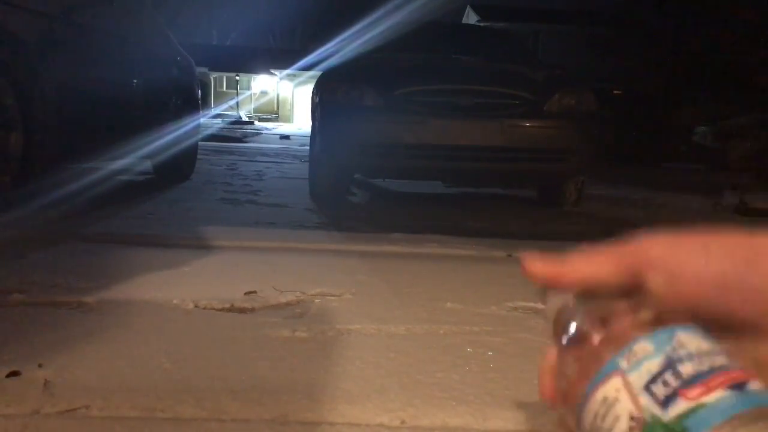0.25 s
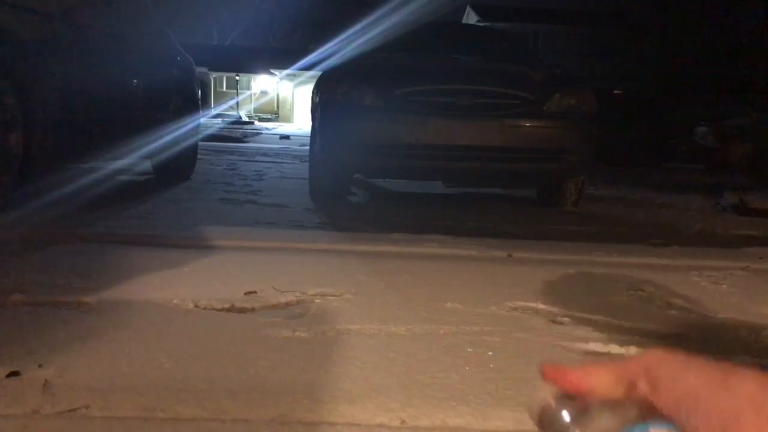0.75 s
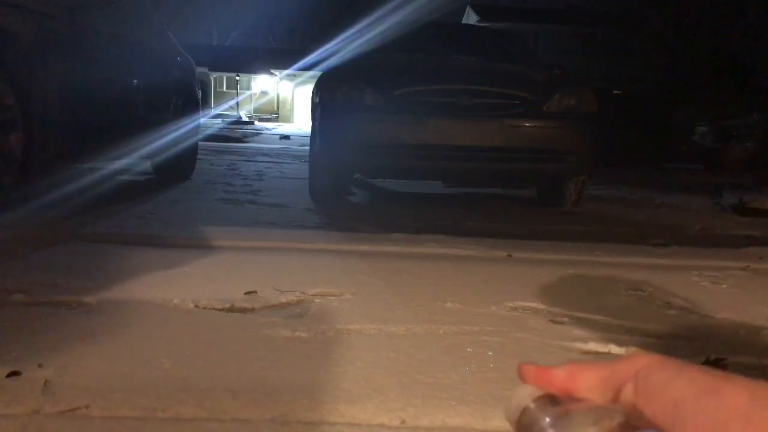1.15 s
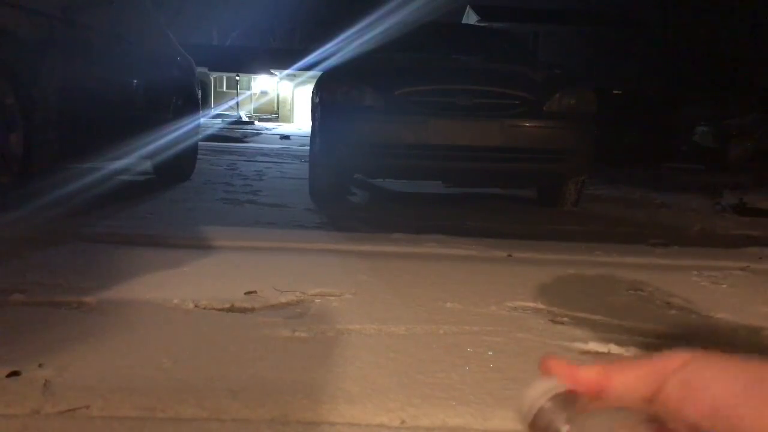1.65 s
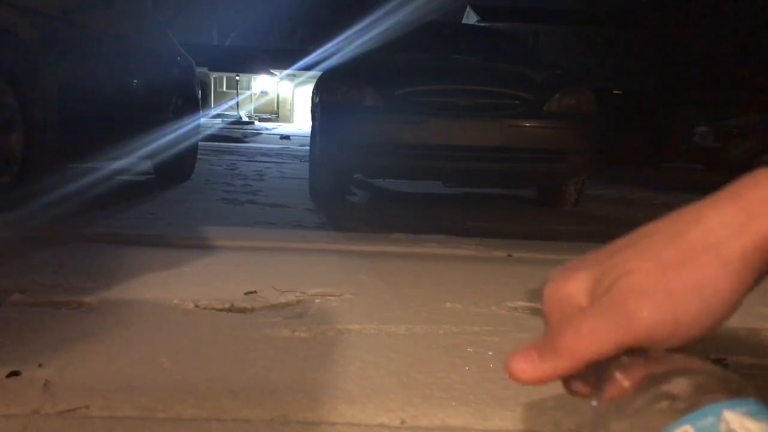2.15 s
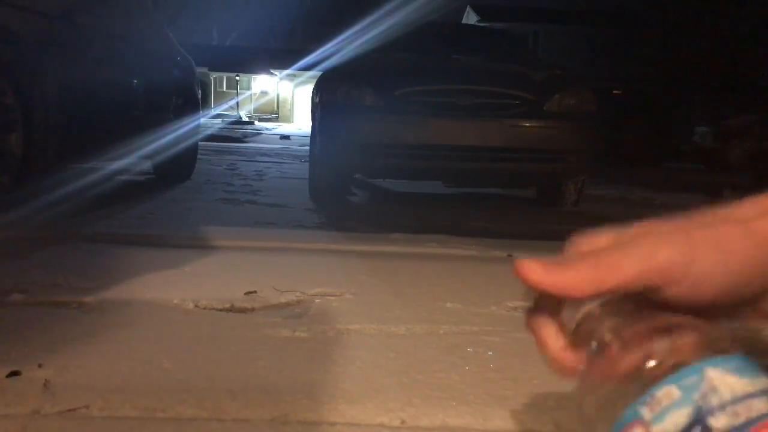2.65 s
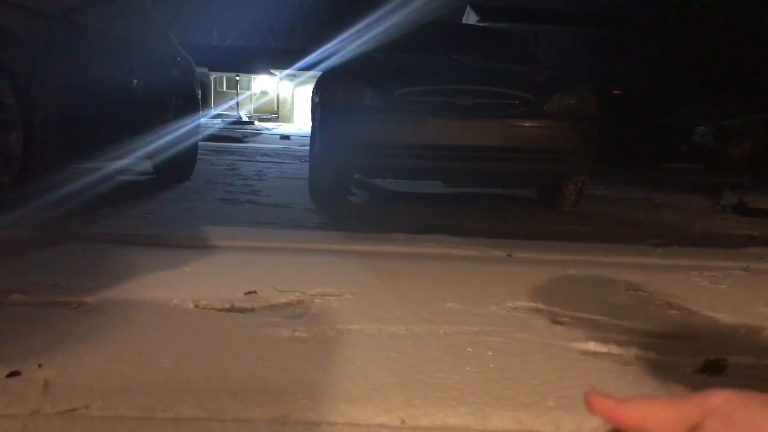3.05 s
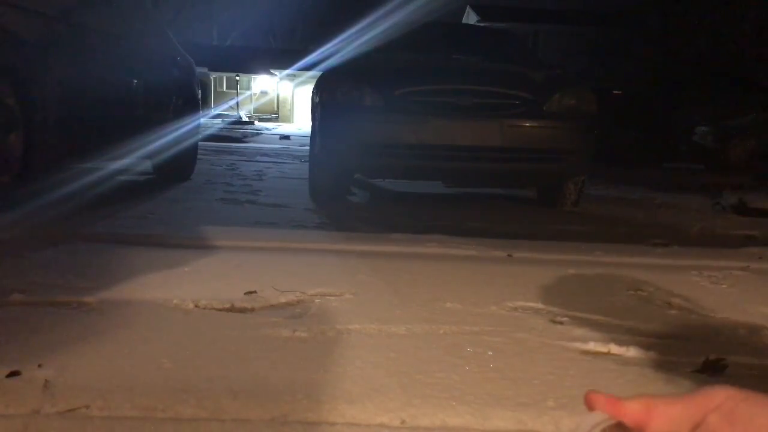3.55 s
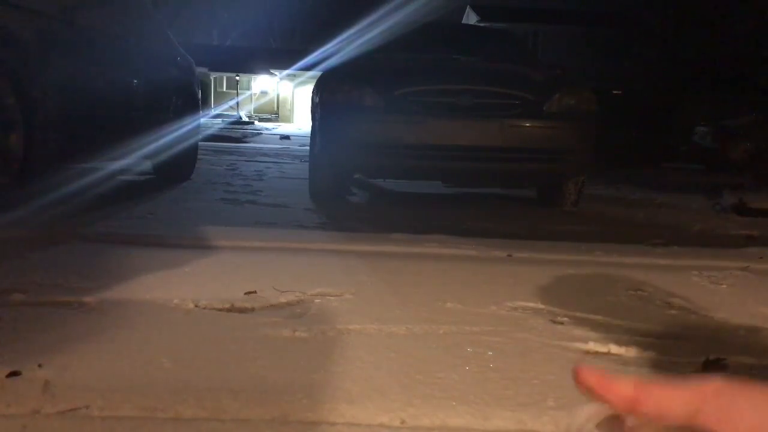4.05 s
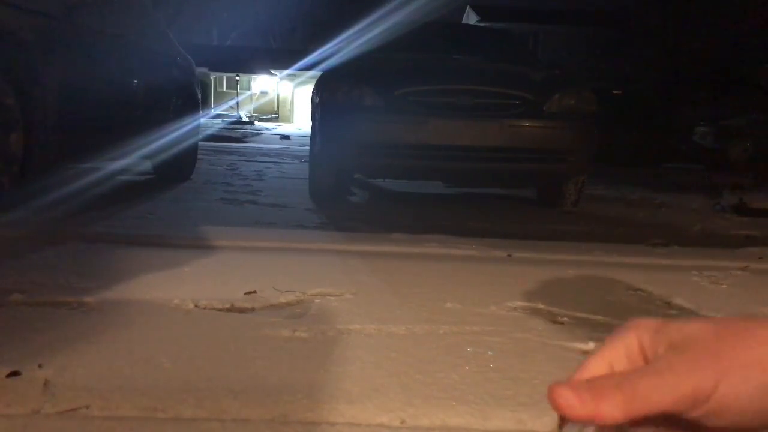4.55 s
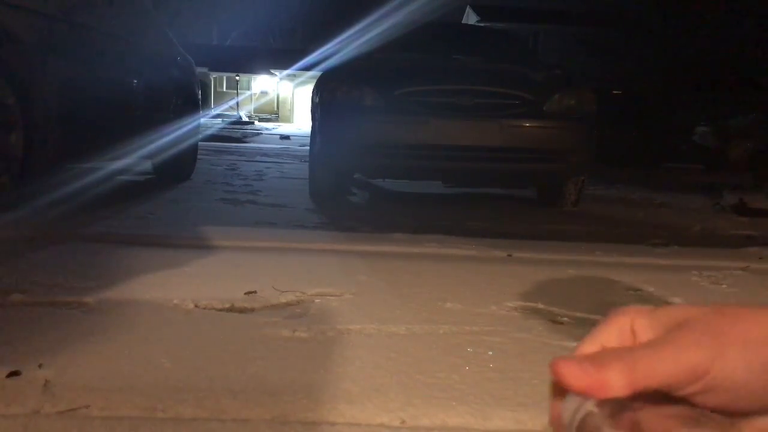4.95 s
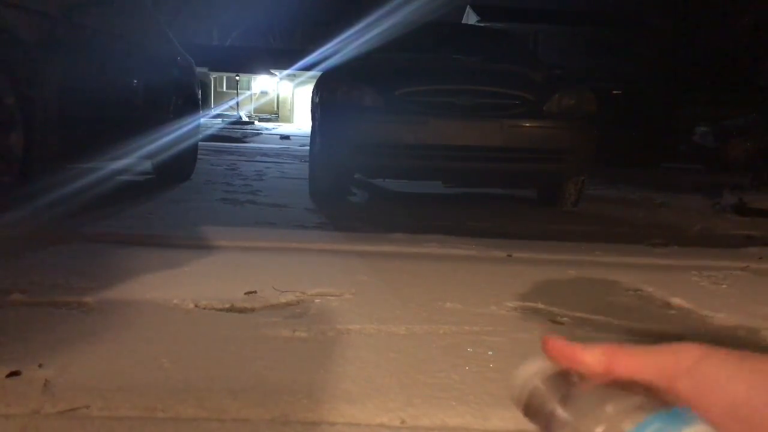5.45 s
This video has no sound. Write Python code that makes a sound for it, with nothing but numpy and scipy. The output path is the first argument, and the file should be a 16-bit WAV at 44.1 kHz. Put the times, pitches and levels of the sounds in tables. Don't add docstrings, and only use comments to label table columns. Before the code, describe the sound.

A plastic bottle is handled very close to a phone microphone outdoors at night. From 0 to 0.6 s, crisp cap snaps, grainy finger slips and a short hollow wall pop at 0.2 s sound over a faint leak of gas. At about 0.7 s the gas bursts out as a loud, bright, slightly fluttering hiss, holding steady until 1.6 s, then thinning with a plastic knock near 1.8 s and trailing away by 2.4 s. Quiet rubs, squeaks and dull knocks follow, with small snaps around 2.9 s. A second, softer hiss grows from 3.25 s, strongest at 3.65 to 3.9 s with a thin wavering whistle, and fades by 4.1 s. Hard plastic clicks cluster at 4.15 to 4.2 s with a soft low thump, then finger scrapes, creaks and tiny spits become sparse until 5.7 s. Distant traffic rumbles very faintly throughout under thin air noise.

```python
import sys
import numpy as np
from scipy import signal
from scipy.fft import rfft, irfft
from scipy.io import wavfile
from scipy.ndimage import uniform_filter1d, map_coordinates

SR = 44100
rng = np.random.default_rng(int(sys.argv[2]) if len(sys.argv) > 2 else 0)


def volts(x):
    e = np.asarray(x, float) / 20
    return 10 ** e


def unload_wav(signal):
    wavfile.write(
        sys.argv[1],
        SR,
        np.round(np.clip(np.atleast_2d(signal).T, -1, 1) * 32767).astype(np.int16),
    )


N = 252252
T = np.arange(N) / SR
F = np.arange(N // 2 + 1) * SR / N + 1e-3


def track(table):
    return np.interp(T, *np.transpose(table))


def shaped(x, colour, lo_hz=0., hi_hz=SR, db=0):
    hz, level_db = np.transpose(colour)
    skirts = 1 / np.sqrt((1 + (lo_hz / F) ** 12) * (1 + (F / hi_hz) ** 12))
    gain = volts(np.interp(np.log(F), np.log(hz), level_db))
    y = irfft(rfft(x) * gain * skirts, N)
    return y * volts(db) / np.std(y)


def walk(rate_hz):
    hold = max(int(SR / rate_hz), 1)
    steps = np.repeat(rng.standard_normal(N // hold + 1), hold)
    return 0.79 * uniform_filter1d(uniform_filter1d(steps, hold), hold)[:N]


def resonance(x, hz, width_hz, order=1):
    half = width_hz / 2
    centre = np.hypot(hz, half)
    band = [centre - half, min(centre + half, .48 * SR)]
    return signal.sosfilt(signal.butter(order, band, "band", fs=SR, output="sos"), x)


def ring(hz, t60_s):
    t = T[:int(t60_s * SR)]
    return np.sin(2 * np.pi * hz * t) * np.exp(-np.log(1000) * t / t60_s)


def add(out, s, x):
    i = int(s * SR)
    out[i:i + len(x)] += x[:N - i]


# (centre [Hz], width [Hz], gain [ratio])
RIDGES = [(3140, 920, 0.27), (4430, 126, 0.44)]


def ridged(x):
    return x + sum(gain * resonance(x, hz, width_hz) for hz, width_hz, gain in RIDGES)


# (time [s], extra path [ms], share [0-1])
GROUND = [(0, 1.2, 0.4), (.3, .83, 0.5), (.7, 0.98, 0.16), (1.45, 0.94, 0), (2.2, 1.6, 0), (2.42, 0.75, .6),
          (3.2, 0.954, .24), (4.5, 0.92, .1), (4.75, 0.82, .5), (5.4, 1.2, .05)]


def ground_echo(gas):
    s, path_ms, share = np.transpose(GROUND)
    share = np.clip(np.interp(T, s, share), 0, 1)
    delay = np.interp(T, s, path_ms) * SR / 1000
    late = map_coordinates(gas, [np.arange(N) - delay], order=3)
    return (gas + share * late) / np.sqrt(1 + share ** 2)


# (frequency [Hz], density [dB per Hz])
JET_COLOUR = [(240, -63), (400, -18), (491, -28), (672, -28), (1590, -23.5), (2120, -19.5), (2680, -19),
              (4360, -13.5), (4860, -16.5), (6060, -13.5), (8300, -6.5), (9560, -6.5), (10500, -9.5),
              (12900, -0.5), (17100, 1.5)]
# (time [s], flow [dB], gap opening [about -1..1])
LONG_HISS = [(.64, -80, 0.35), (.71, -50.5, 0.6), (.742, -35.5, 1), (.8, -23.5, 0.94), (.86, -24, 1),
             (1.15, -23, 0.99), (1.585, -23, 0.59), (1.63, -26, 0.44), (1.79, -33, 0)]
LAST_GAS = [(1.82, -32.5, -1.6), (1.952, -30, -1.34), (2.054, -34.5, -1.1), (2.142, -36, 0.57),
            (2.25, -38.5, -0.067), (2.344, -50.5, 0.62), (2.4, -50.5, -.5), (2.47, -81, 0)]
SHORT_HISS = [(3.19, -76, 0), (3.254, -44, 0), (3.306, -38, 0.17), (3.386, -36.5, -0.14),
              (3.58, -30.5, 0.24), (3.664, -27, -0.071), (3.884, -26.5, -0.36), (4.12, -52.5, 0.071),
              (4.3, -87, 0)]
# (time [s], flow [dB])
LEAK = [(0, -38.5), (.148, -51), (.25, -51), (.42, -52), (.53, -49), (.66, -53.5), (2.4, -54), (2.52, -64),
        (2.87, -65), (3.04, -68), (3.13, -61), (4.2, -60), (4.68, -61.5), (4.85, -56.5), (5.13, -68),
        (5.43, -65.5), (5.72, -68)]
LEAK_MIDDLE_DB = -3.5
FULL_FLOW_DB = -23
# (level at full flow [dB], growth [dB/dB], per unit opening [dB])
MIDDLE, NECK_AIR, LOW = (-35.5, 1.08, 3.4), (-41.5, 0.73, 4.1), (-52, 0.51, 2.8)
SHUT_DB, SHUT_SLOPE = -49.5, 2.4


def jet():
    eddies = ridged(rng.standard_normal(N) * volts(1.0 * walk(900) + .5 * walk(250)))
    s, db, gap = np.transpose(LONG_HISS + LAST_GAS + SHORT_HISS)
    flow_db, gap = np.interp(T, s, db), np.interp(T, s, gap)

    def eddy_gain(full_db, growth, gap_db):
        return volts(full_db + growth * (flow_db - FULL_FLOW_DB) + gap_db * gap)

    leak = hush() * volts(track(LEAK))
    shut = volts(SHUT_SLOPE * np.minimum(flow_db - SHUT_DB, 0))
    top = volts(flow_db) + leak
    middle = eddy_gain(*MIDDLE) + volts(LEAK_MIDDLE_DB) * leak
    neck, low = eddy_gain(*NECK_AIR) * shut, eddy_gain(*LOW) * shut
    top = top * volts(1.2 * walk(120))
    middle = middle * volts(1.0 * walk(90))
    gas = top * shaped(eddies, JET_COLOUR, 9980, db=2.5)
    gas = gas + middle * shaped(eddies, JET_COLOUR, 4900, 11900, db=-0.5)
    gas = gas + neck * shaped(eddies, JET_COLOUR, 2870, 5450, db=-2.5)
    gas = gas + low * shaped(eddies, JET_COLOUR, 540, 2264, db=-0.4)
    return ground_echo(gas)


# (time [s], pitch [Hz], level [dB])
WHISTLE = [(3.605, 1940, -57), (3.615, 1950, -52), (3.679, 2140, -51.5), (3.795, 1995, -52.5),
           (3.803, 2000, -55.5), (3.901, 1916, -54), (3.915, 1830, -66)]


def whistle():
    s, hz, db = np.transpose(WHISTLE)
    waver = 1 + .009 * walk(200)
    phase = 2 * np.pi * np.cumsum(np.interp(T, s, hz) * waver) / SR
    ragged_rad = .6 * walk(250)
    gain = np.sqrt(2) * volts(np.interp(T, s, db, -120, -120) + 2.1 * walk(60))
    octave = volts(-1.0 + 3.0 * walk(80)) * np.sin(2 * phase + ragged_rad)
    return uniform_filter1d(gain, size=200) * (np.sin(phase) + octave)


# (start [s], end [s], level [dB], pitch [Hz])
SLIPS = [(0, .055, -41, 4100), (.06, .09, -47, 3520), (.16, .29, -55, 9000), (.196, .239, -45, 3000),
         (.355, .408, -48.5, 3580), (.46, .534, -49.5, 2420), (2.02, 2.13, -50, 2870),
         (2.927, 2.948, -44, 3350), (2.993, 3.076, -50, 3500), (3.074, 3.124, -56, 3460),
         (4.192, 4.203, -45, 3000), (4.207, 4.245, -53, 3000), (4.382, 4.455, -52.5, 3180),
         (4.456, 4.56, -51.5, 2860), (4.57, 4.627, -58, 4200), (4.629, 4.665, -49, 2800),
         (5.012, 5.073, -56, 3280), (5.5, 5.595, -64.5, 3500), (5.601, 5.655, -52.5, 2900)]
DRAGS = [(.093, .2, -58.5, 2530), (.244, .36, -61, 2500), (.4, .453, -53.5, 2500), (.536, .62, -68, 2550),
         (2.45, 2.6, -61, 2570), (2.6, 2.72, -64, 2460), (2.805, 2.875, -56.5, 1800),
         (2.95, 2.994, -56.5, 3000), (4.112, 4.182, -57.5, 3000), (4.248, 4.383, -55.5, 3600),
         (5.128, 5.31, -65, 2830), (5.4, 5.491, -63.5, 2900), (1.95, 2.25, -58, 1400)]
SQUEAKS = [(.451, 0.5, -51, 3200), (1.95, 2.003, -49.5, 3030), (2.56, 2.618, -74, 4000),
           (2.716, 2.804, -53.5, 2900), (2.81, 2.86, -60, 2960), (2.855, 2.887, -51.5, 3130),
           (2.999, 3.064, -49.5, 2780), (3.632, 3.9, -57, 4350), (4.58, 4.625, -56, 1500),
           (4.585, 4.605, -65, 4600), (4.39, 4.45, -70, 3500), (.79, .92, -48, 2170),
           (3.28, 3.37, -56, 3100), (.357, 0.393, -56, 3340), (5.33, 5.49, -63, 2940)]
CREAKS = [(0, .088, -59.5, 1230), (.196, .233, -45.5, 900), (1.7, 1.88, -62.5, 241),
          (1.736, 1.765, -50.5, 706), (1.894, 2.308, -59.5, 480), (2.453, 2.6, -64, 700),
          (2.745, 2.801, -51, 810), (2.938, 2.955, -51, 1030), (2.997, 3.067, -55, 1200),
          (4.008, 4.076, -58.5, 248), (4.467, 4.556, -55.5, 930), (4.56, 4.675, -52, 885),
          (4.682, 4.865, -63.5, 605), (4.69, 4.83, -75, 1500), (5.026, 5.067, -63, 990),
          (5.31, 5.36, -55.5, 700), (5.366, 5.646, -61.5, 1230)]
# (width / pitch [ratio], swell start to end [dB], sizzle above body [dB])
SLIP, DRAG, SQUEAK, CREAK = (0.81, -6.5, -5.5), (1.77, -0.35, -15), (.2, -0.76, -18), (1.34, -2, -16)


def fingers():
    out = np.zeros(N)
    grains = rng.standard_normal(N) * volts(2.0 * walk(400) + 1.9 * walk(70))
    sizzle = resonance(grains, 8300, 12000)
    grains = ridged(grains)
    kinds = (SLIPS, SLIP), (DRAGS, DRAG), (SQUEAKS, SQUEAK), (CREAKS, CREAK)
    for strokes, (share, swell_db, sizzle_db) in kinds:
        for start, end, db, hz in strokes:
            length = end - start
            i, t = int(start * SR), T[:int((length + .04) * SR)]
            rub = resonance(grains[i:i + len(t)], hz, share * hz)
            rub = 0.57 * resonance(rub, hz, 2.25 * share * hz) + 0.23 * rub
            touch = np.clip(t / 0.0047, 0, 1) * np.exp(-np.clip(t - length, 0, 1) / 0.0051)
            level = volts(db + swell_db * t / length)
            stroke = rub / np.std(rub) + volts(sizzle_db) * sizzle[i:i + len(t)]
            add(out, start, level * touch * stroke)
    return out


# (time [s], peak [dB], pitch [Hz], t60 [s])
KNOCKS = [(.048, -33, 800, 0.013), (.261, -45, 1400, .013), (.413, -40, 1500, .016),
          (.792, -33.5, 1130, 0.022), (1.83, -30.5, 1290, 0.02), (1.864, -43, 700, .013),
          (2.7405, -32.5, 910, 0.019), (2.751, -34.5, 900, 0.011), (2.762, -39, 800, .015),
          (2.79, -44, 900, .015), (3.99, -38.5, 1030, .024), (4.025, -44, 1700, .012),
          (4.1477, -34, 1100, 0.013), (4.149, -39.5, 350, .02), (4.188, -24, 1390, .012),
          (4.19, -37.5, 350, 0.021), (4.1943, -33.5, 1180, .016)]
SNAPS = [(.005, -25.5, 4560, 0.031), (.033, -26, 5000, .011), (.0353, -24.5, 3530, 0.019),
         (.044, -33, 5500, .012), (.0555, -23, 5040, .009), (.4412, -26.5, 4200, 0.011),
         (2.937, -31, 4230, .01), (2.95, -29, 3550, 0.0066), (3.311, -33, 4500, .005),
         (4.135, -30.5, 4400, .015), (4.149, -25.5, 4470, 0.0038), (4.1882, -24, 4700, 0.0088)]
SPITS = [(.4145, -37, 7000, .006), (2.365, -38, 9100, .004), (2.657, -45, 13000, .004),
         (2.718, -43, 12000, .004), (2.937, -40, 11000, .006), (2.972, -44, 11000, .004),
         (4.2, -39, 7500, .008), (4.895, -42, 11000, .007), (5.28, -49, 12000, .004),
         (5.47, -52, 7000, .008)]
# (width / pitch [ratio], crack [dB])
KNOCK, SNAP, SPIT = (0.61, -41), (0.53, -4.5), (1, -1.5)


def ticks():
    out = np.zeros(N)
    for events, (share, crack_db) in ((KNOCKS, KNOCK), (SNAPS, SNAP), (SPITS, SPIT)):
        for s, db, hz, t60 in events:
            n = int(t60 * SR)
            splinters = rng.standard_normal(2048)[:n] * np.exp(-np.log(1000) * T[:n] / t60)
            splinters[0] += 4.0
            body = resonance(resonance(splinters, hz, share * hz), hz, 13.0 * share * hz)
            crack = volts(crack_db) * 0.59 * np.diff(splinters, prepend=0)
            add(out, s, volts(db) * (body / np.abs(body).max() + crack))
    return out


POP_S, POP_DB = .2005, -22.5
# (frequency [Hz], level [dB], t60 [s])
WALL = [(275, -2.5, 0.064), (480, -39, 0.032), (700, -15, 0.026), (844, 8.5, 0.036), (1010, 1, 0.064),
        (1500, 3, 0.013), (1920, -12, 0.1), (2360, -21, 0.054), (3070, -11, 0.14), (3740, -25, .05)]
# (time [s], peak [dB], pitch [Hz], t60 [s])
THUMPS = [(4.195, -43, 50, .2), (4.283, -40, 47, .14), (2.745, -44, 65, .15)]
# (time [s], peak [dB], pitch [Hz], t60 [s])
RINGS = [(3.956, -36, 4700, 0.022), (4.1488, -25.5, 2580, 0.011), (4.188, -19, 2560, 0.011),
         (4.194, -33, 4600, 0.013), (4.494, -45, 487, 0.043), (4.542, -42.5, 434, .06),
         (5.014, -48, 3020, .02)]


def wall_modes():
    out = np.zeros(N)
    for hz, db, t60 in WALL:
        add(out, POP_S, -volts(POP_DB + db - 12) * ring(hz, t60))
    for s, db, hz, t60 in THUMPS + RINGS:
        add(out, s, volts(db) * ring(hz, t60))
    return out


# (time [s], level [dB])
RUMBLE = [(0, -57), (.62, -55.5), (1.26, -58.5), (2.09, -56), (2.64, -56), (3.82, -58.5), (4.24, -54),
          (4.49, -58.5), (4.75, -55.5), (5.72, -55.5)]
# (frequency [Hz], density [dB per Hz])
NIGHT = [(12, -42), (20, -16), (54, -3), (87, -1.5), (129, -3.5), (473, -14), (1460, -16), (2370, -23),
         (2970, -19), (4410, -19.5), (4930, -26.5), (8440, -25.5), (10600, -46), (12900, -15), (17100, -40)]
AIR_DB = -60.5


def night():
    drone = rng.standard_normal(N)
    drone = drone + 2.87 * resonance(drone, 67.0, 45) + 1.6 * resonance(drone, 117.7, 17.5)
    rumble = volts(track(RUMBLE) + 0.63 * walk(12)) * shaped(drone, NIGHT, 0., 346, db=2.0)
    air = volts(AIR_DB) * hush() * shaped(rng.standard_normal(N), NIGHT, 286)
    return rumble + air


# (middle [s], half length [s], depth [dB])
HUSHES = [(.1, 0.25, -4.5), (2.41, 0.13, -5.5), (2.613, .06, -4), (2.912, 0.015, -4.5), (3.17, 0.055, -5),
          (3.6, 0.41, -6), (4.89, .13, -5.5), (5.3, 0.83, -1)]


def hush():
    return volts(sum(db * np.exp(-((T - s) / half) ** 4) for s, half, db in HUSHES))


def scene():
    return (jet() + whistle() + fingers() + ticks() + wall_modes() + night())[None]


def top_cut(x):
    return signal.sosfilt(signal.butter(12, 18460, fs=SR, output="sos"), x)


TOP_HZ = 17200
PORT_HZ, PORT_WIDTH_HZ, PORT_DIP = 10500, 750, 0.51


def record(dry):
    x = signal.sosfilt(signal.ellip(12, .2, 80, TOP_HZ, fs=SR, output="sos"), dry)
    x = x - PORT_DIP * resonance(x, PORT_HZ, PORT_WIDTH_HZ)
    return top_cut(x)


dry = scene()
out = record(dry)
unload_wav(out)
```